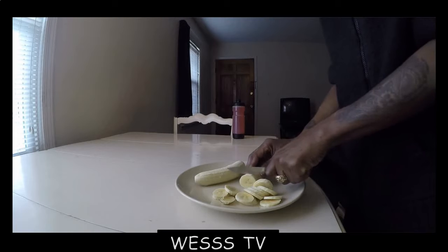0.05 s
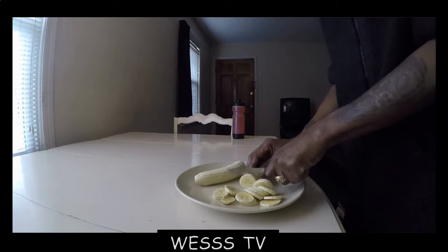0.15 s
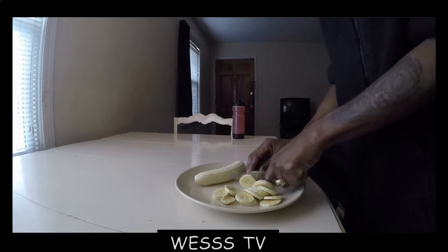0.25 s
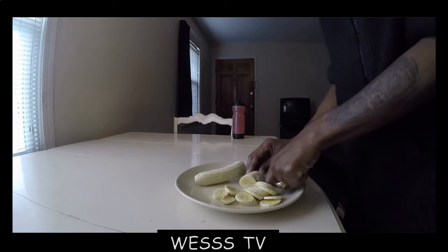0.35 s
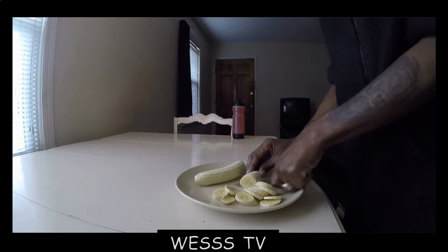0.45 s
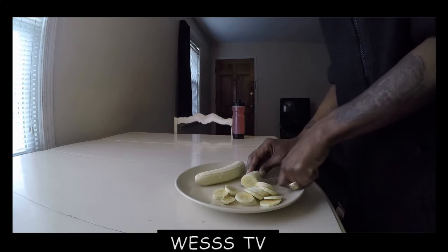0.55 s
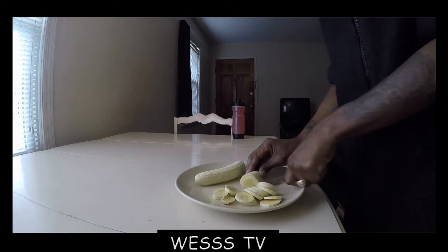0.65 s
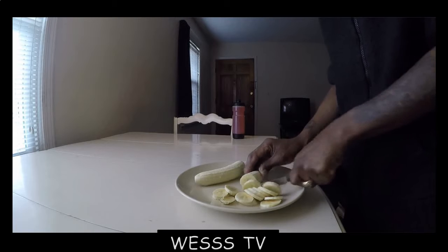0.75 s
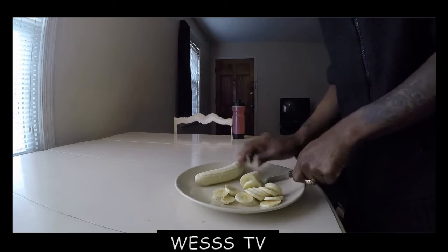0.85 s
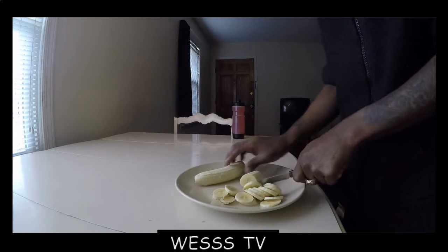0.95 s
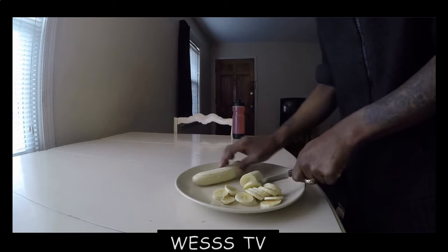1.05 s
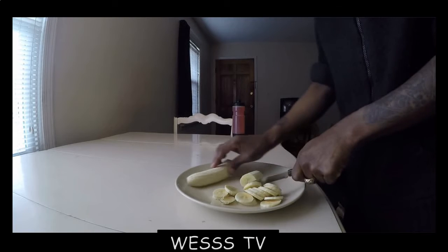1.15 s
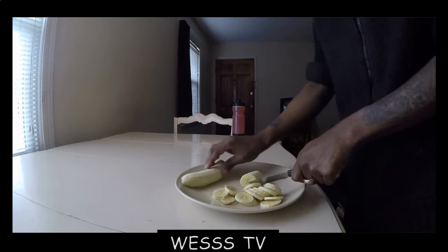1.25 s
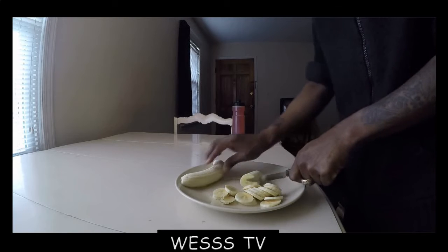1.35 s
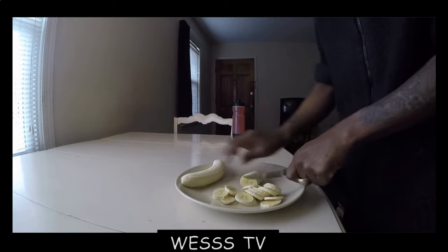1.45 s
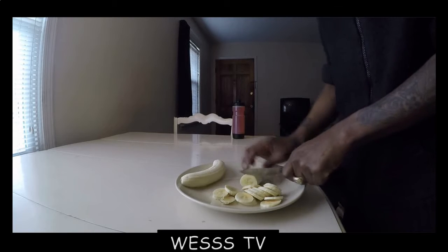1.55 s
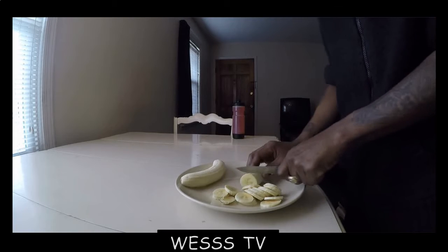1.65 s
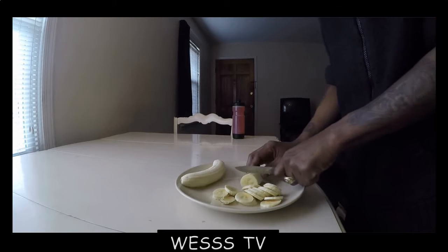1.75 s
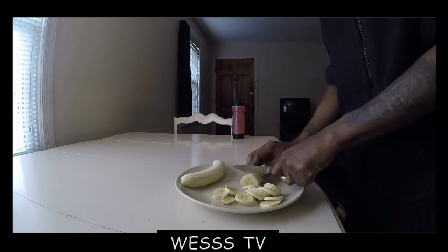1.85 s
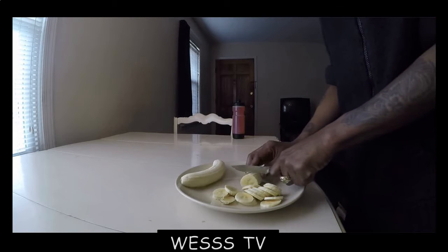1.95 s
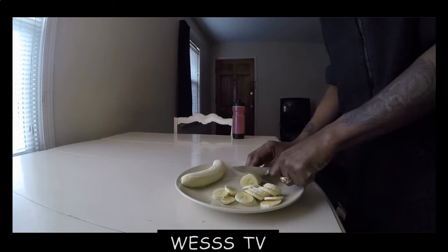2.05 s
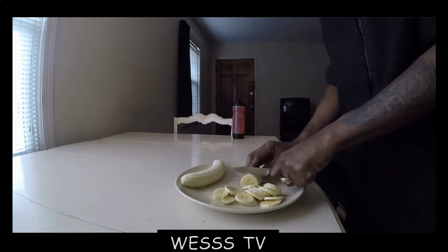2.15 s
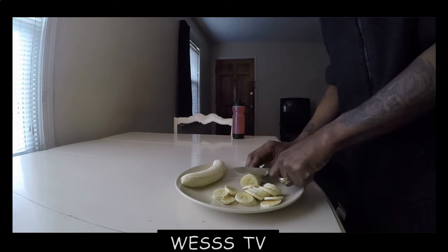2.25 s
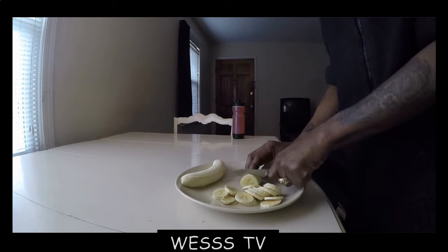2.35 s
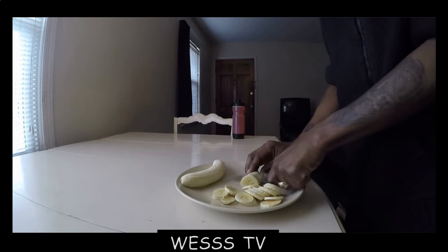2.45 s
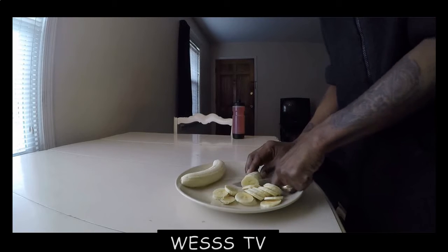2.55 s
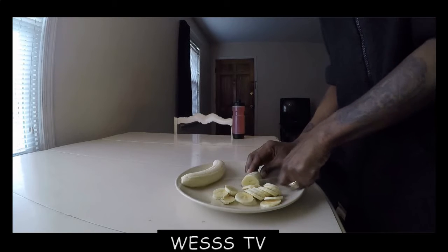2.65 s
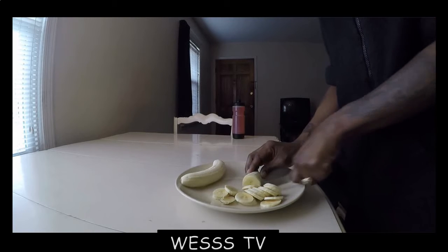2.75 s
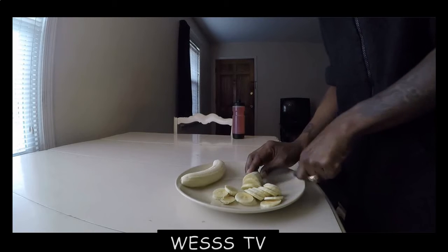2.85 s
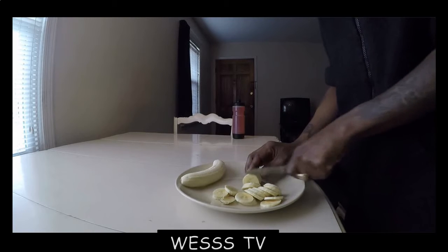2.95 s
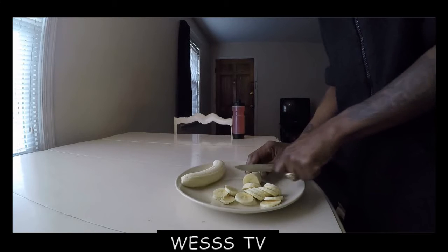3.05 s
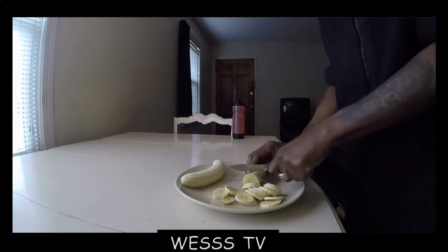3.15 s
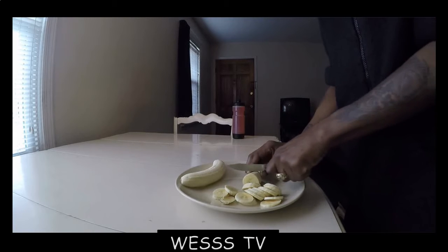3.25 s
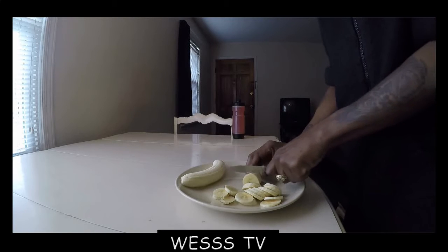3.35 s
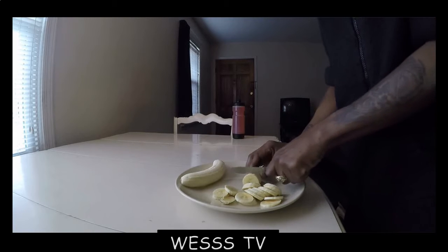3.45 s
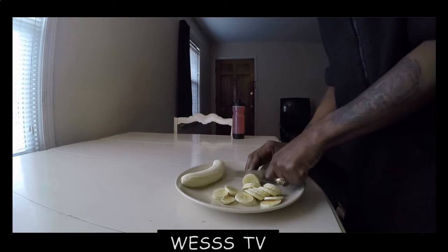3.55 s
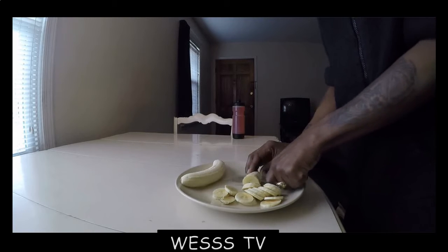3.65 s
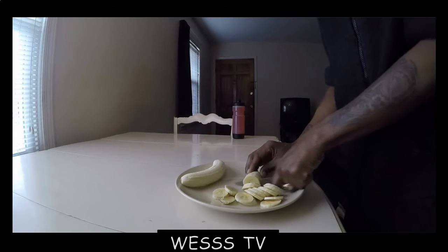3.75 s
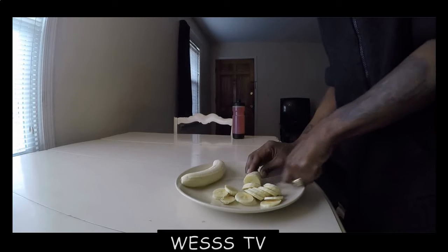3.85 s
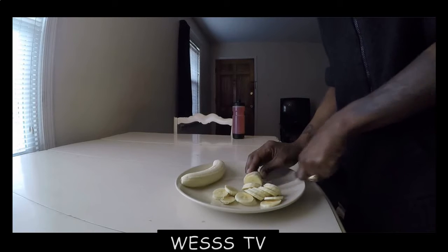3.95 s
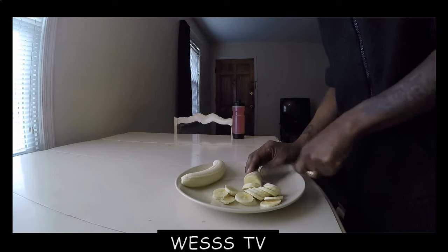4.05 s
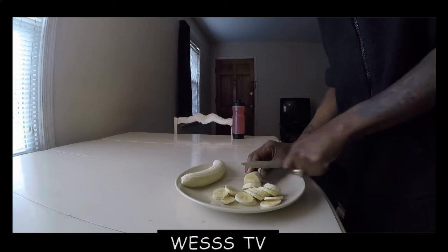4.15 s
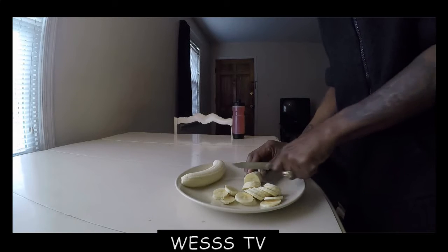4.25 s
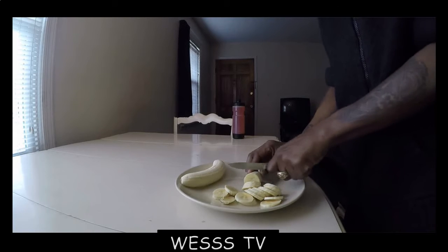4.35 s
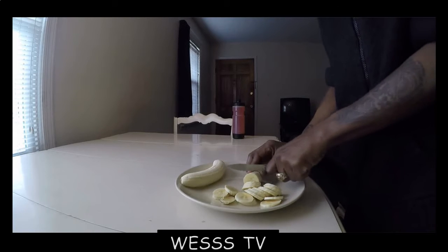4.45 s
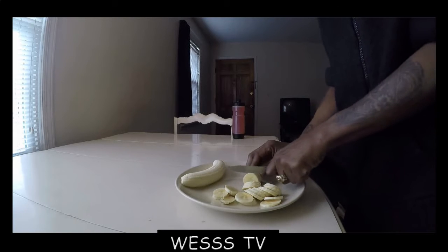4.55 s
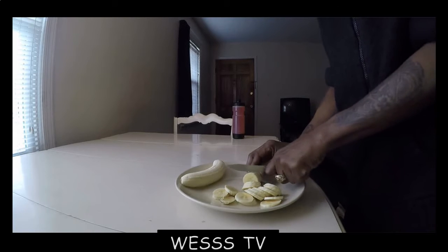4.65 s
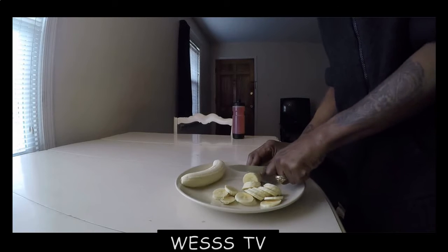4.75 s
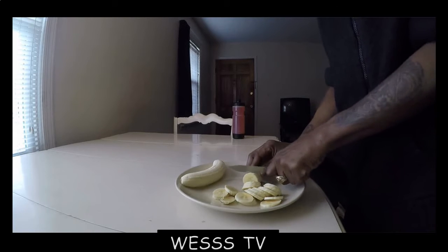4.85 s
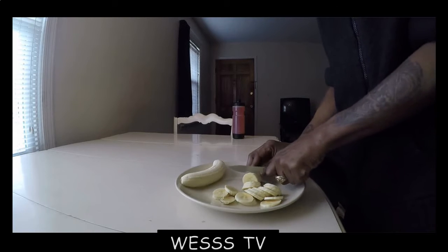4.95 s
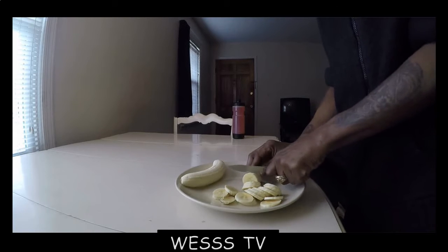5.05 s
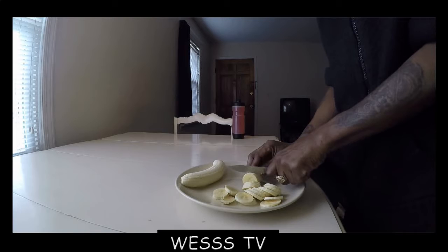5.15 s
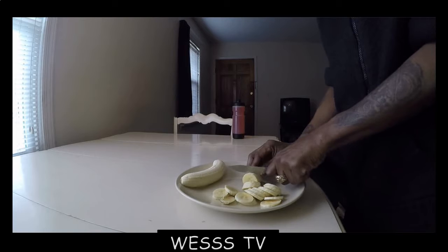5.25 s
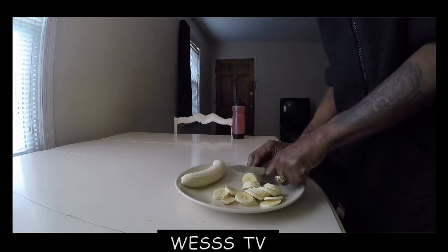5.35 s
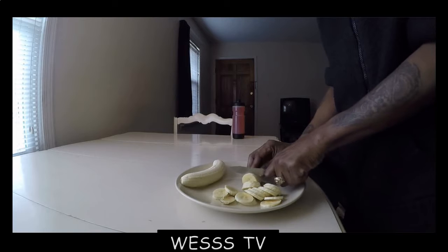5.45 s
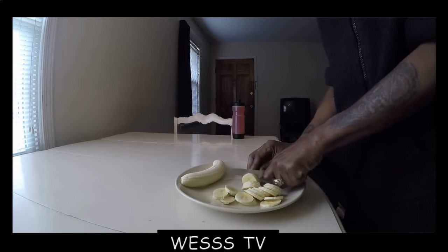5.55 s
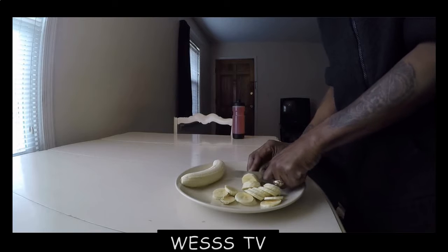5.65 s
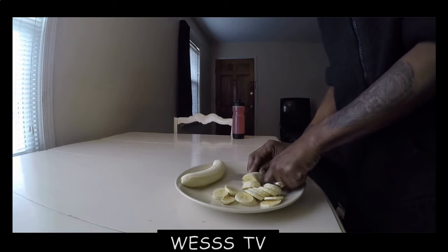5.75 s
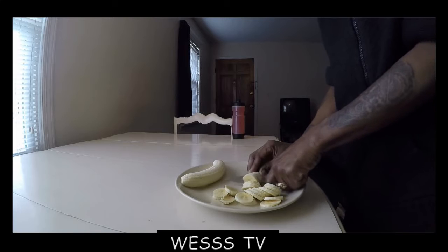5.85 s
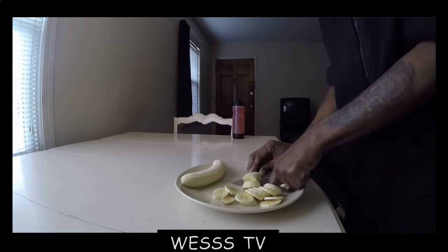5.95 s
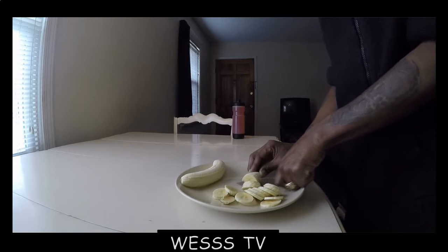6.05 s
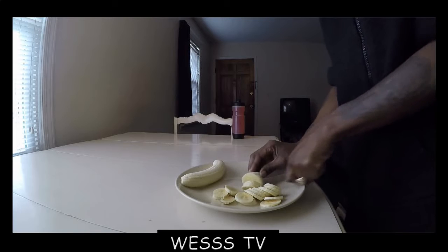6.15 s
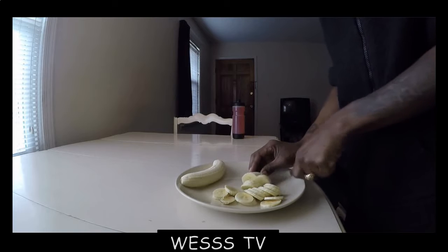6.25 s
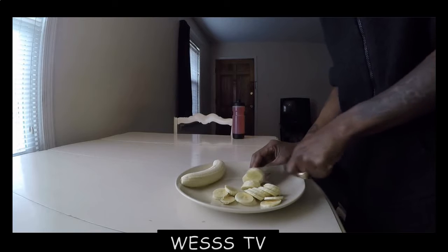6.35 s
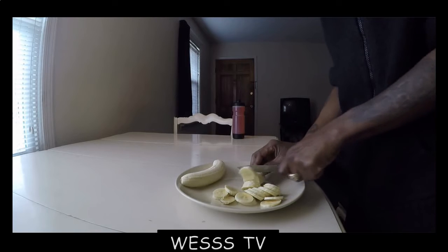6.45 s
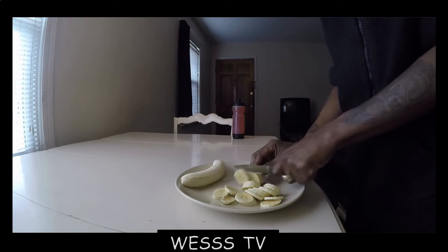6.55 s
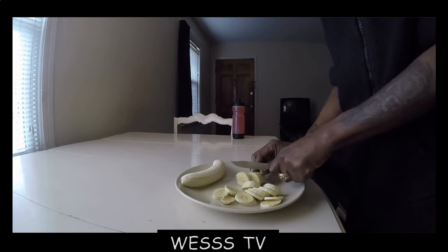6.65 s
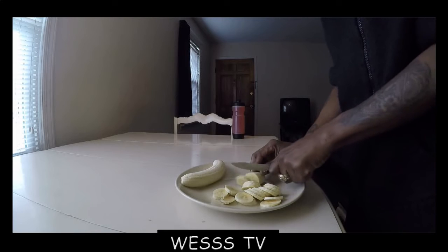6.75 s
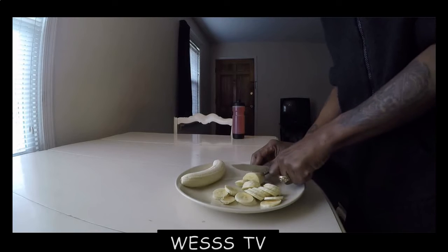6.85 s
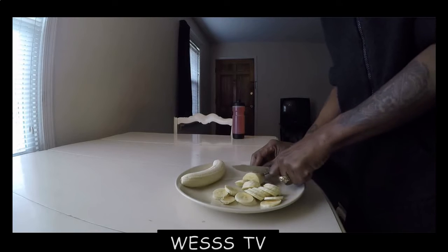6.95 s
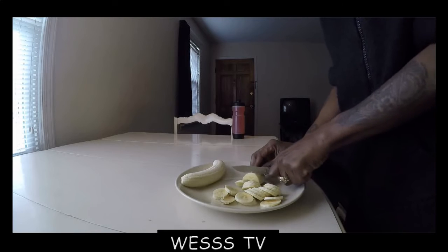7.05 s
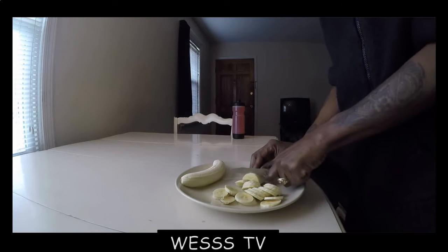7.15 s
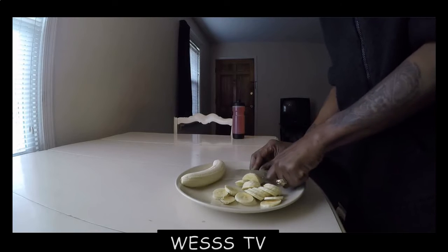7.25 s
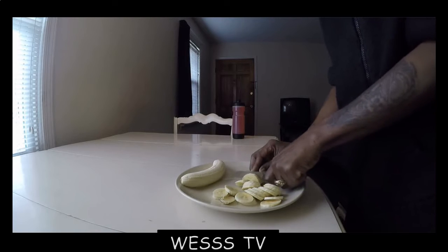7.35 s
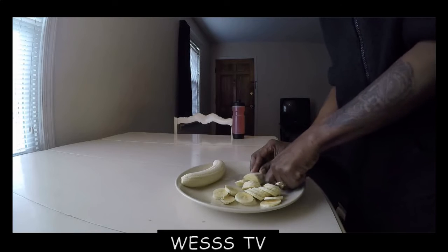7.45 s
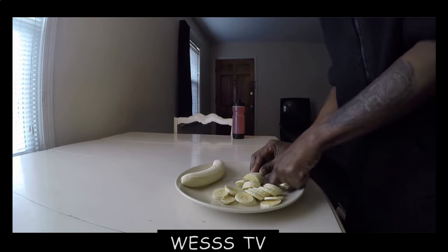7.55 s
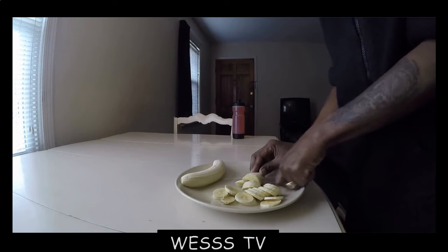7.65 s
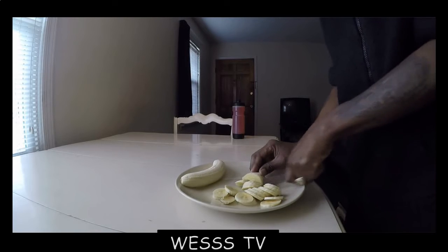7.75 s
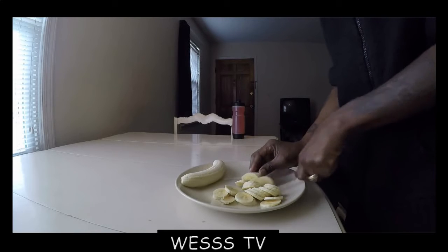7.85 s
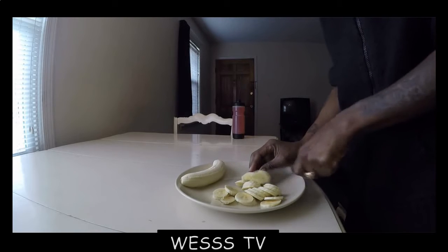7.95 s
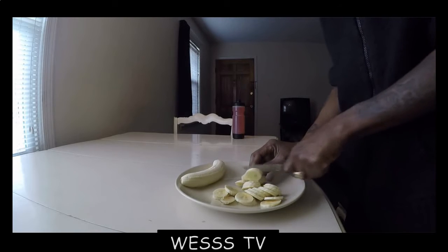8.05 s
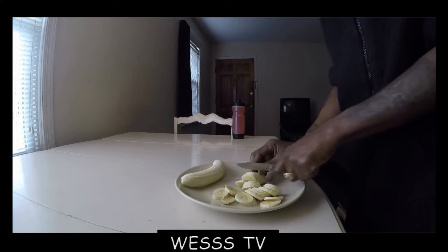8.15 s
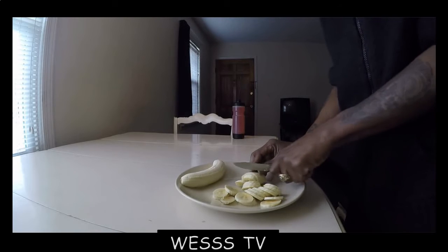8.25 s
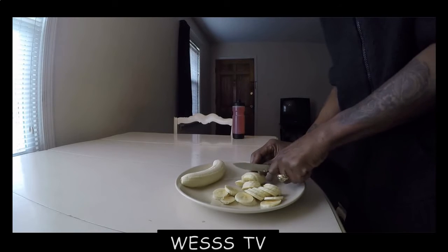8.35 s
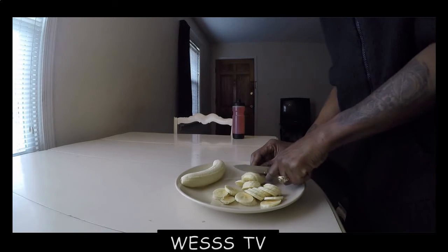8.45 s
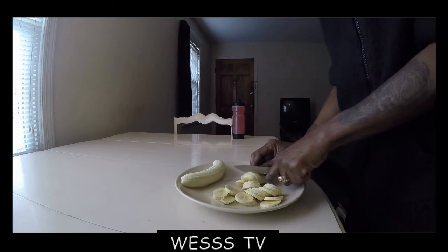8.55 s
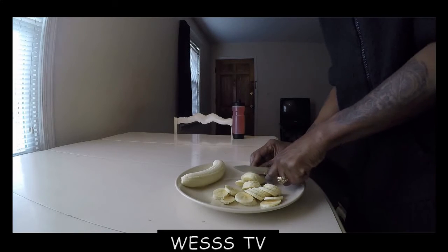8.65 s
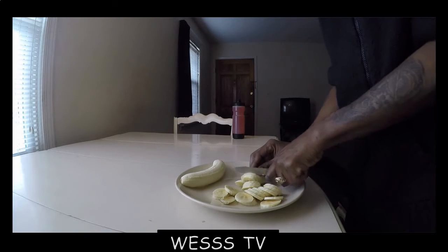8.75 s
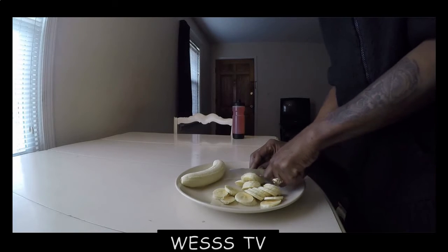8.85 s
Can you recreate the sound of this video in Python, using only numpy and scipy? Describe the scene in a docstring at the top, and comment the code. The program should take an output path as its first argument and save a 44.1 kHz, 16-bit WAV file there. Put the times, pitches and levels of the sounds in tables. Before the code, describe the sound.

Five unhurried knife cuts through soft fruit tap sharply on a ceramic plate and scrape back over the glaze, above faint room rumble.

```python
"""Slicing a banana on a plate

A table knife slices a peeled banana on a ceramic plate that stands on a table in a quiet room.
Five times the blade sinks almost silently through the fruit (soft hiss), clinks on the plate (dying
sine waves and noise bursts) and is drawn back, scraping over the glaze towards the rim (random tiny slips).
A near wall answers each clink. Faint squeaks, rubs and one low tone are heard between the cuts,
over a room that rumbles and hums faintly (shaped noise and a wavering sine)."""
import sys
import numpy as np
from scipy import signal
from scipy.fft import rfft, irfft, next_fast_len
from scipy.io import wavfile
from scipy.ndimage import uniform_filter1d

SR = 44100
rng = np.random.default_rng(int(sys.argv[2]) if len(sys.argv) > 2 else 0)


def to_wav(sig):
    """Store sig (one row per channel, or 1-D mono) as 16-bit WAV at the path in sys.argv[1].

    Samples outside -1..1 are clipped; the rate is SR.
    """
    pcm = np.clip(np.atleast_2d(sig), -1, 1) * 32767
    pcm = np.round(pcm).astype(np.int16)
    wavfile.write(sys.argv[1], SR, pcm.T)  # frames by channels


N = 392049

# In the tables, t60 is the time a sound takes to fade by 60 dB.
# Ways the room's background is loud or soft at each pitch: (frequency [Hz], relative level per Hz [dB])
AMBIENCE_SPECTRUM = [(11, -29), (20, -2), (34, 2.5), (58, -4), (80, -11.5), (100, -17.5), (130, -11),
                     (190, -19), (340, -24), (470, -32), (700, -36.5), (1400, -40), (5000, -44),
                     (15500, -55.5)]
# Early echoes off the table and the near wall: (delay [ms], level [dB])
EARLY_ECHOES = [(2.3, -11.5), (8.6, -9), (9.9, -8), (11.3, -9.5), (20.5, -14)]
# How long the room rings on at each pitch: (frequency [Hz], t60 [s])
ROOM_DECAY = [(80, 1), (400, 0.46), (1400, 0.24), (4000, 0.3), (7000, 0.23), (13000, 0.14)]
# Faint squeaks and rubs: (middle time [s], length [s], frequency [Hz], filter width [Hz], level before fades [dB])
RUB_EVENTS = [(1.097, 0.15, 1370, 300, -70.5), (1.378, 0.34, 345, 24.4, -63), (1.871, 0.11, 310, 50, -59.5),
              (2.058, 0.25, 3400, 696, -71.5), (3.225, 0.24, 1380, 80, -69), (6.496, 0.083, 419, 40, -58.5),
              (6.687, 0.19, 4960, 150, -74.5), (8.215, 0.15, 1046, 50, -68.5)]
# Ringing tones of the table top: (frequency [Hz], t60 [s], relative level [dB])
TABLE_MODES = [(80, .45, 3), (138.4, 0.85, -4)]
# Ringing tones of the steel blade: (frequency [Hz], t60 [s], relative level [dB])
BLADE_MODES = [(2851, 0.037, 3.5), (3000, 0.034, -3), (6230, 0.066, 2.5), (6700, 0.019, -7.5),
               (7080, .04, -3.5), (9300, 0.038, -11.5), (10220, .08, -7), (12250, .07, -11)]
# Ringing tones of the plate:
# (frequency [Hz], longest t60 [s], relative level in the well [dB], relative level near the rim [dB])
PLATE_MODES = [(753.4, .09, -13, -32), (1281, 0.12, -8.5, -9), (1373.6, 0.16, -5.5, -2.5),
               (1473, 0.0689, -3.5, -6), (1554, 0.068, -3.5, 0.5), (1627, 0.049, 1, -3),
               (1794, 0.038, -11, -23), (2003, 0.2, -25, -24.5), (2395, 0.077, -29, -5.5),
               (2820, 0.052, -26, -13.5), (3320, 0.051, -15.5, -7.5), (3580, 0.0587, -7, -0.5),
               (3697, 0.065, -0.5, -2.5), (3813, 0.03, 0.5, 2.5), (3906, 0.11, -6.5, -12.5),
               (3960, 0.051, -3, -16), (4077, .08, -0.5, -17), (4250, 0.061, -4, -20.5),
               (4730, .06, -13.5, -21), (4890, 0.05, -7, -7.5), (5520, 0.031, -28, -36.5),
               (6110, 0.16, -17, -32.5), (6540, .04, -16, -11.5), (7890, 0.05, -8, -16),
               (8300, 0.062, -16, -15), (10120, 0.11, -10, -31), (12200, 0.069, -15, -42),
               (12820, 0.18, -6.5, -38)]
# Strokes of the knife: (edge enters the fruit [s], hiss level before fades [dB],
# edge slides off the plate [s], scraping force [dB])
KNIFE_STROKES = [(.21, -67, 0.72, -44.5), (2.36, -65, 2.803, -36.5), (3.52, -64.5, 3.956, -38),
                 (5.70, -71.5, 6.229, -39.5), (7.40, -67.5, 7.83, -45)]
# Moments when the blade meets the plate: (time [s], ring level [dB], weight of the hand re ring [dB],
# ping of the blade re ring [dB], hardness [dB], place [0 = well, 1 = rim])
BLADE_BLOWS = [(0.4874, -18, -16.5, -20.5, -1.5, 0.048), (2.5726, -16.5, -13, -10, 0, 0.15),
               (3.712, -60.5, 2.5, -4, 9, 0.22), (3.7504, -20, -9.5, -6.5, -2, 0.18),
               (3.9540, -38, -29, -28, -3, 0.9), (5.9265, -55, 16.5, 6.5, -19, 0.57),
               (5.9677, -21.5, 1.5, -5, -1.5, 0.097), (6.1407, -46, -20, -22, -3, 0.64),
               (7.6003, -25.5, -8, -17.5, 8, 0.05), (7.6094, -33, -9.5, -22, 2, 1),
               (7.6232, -50, 25.5, 18.5, -19, 0.6), (7.852, -29, -29, -32, -1, 0.99)]
# Noise of the parting fruit: (frequency [Hz], relative level per Hz [dB])
FLESH_SPECTRUM = [(200, -7), (600, -4.5), (1500, -4), (3000, -9.5), (5000, -9.5), (9000, -18),
                  (15000, -20.5)]
# Grating of the edge on the glaze: (frequency [Hz], relative level per Hz [dB])
GRIT_SPECTRUM = [(300, -24), (1500, 33.5), (2100, -7), (3700, 28.5), (6500, 3), (9000, -31.5), (15000, -50)]
# Rumble of the drag in the table: (frequency [Hz], relative level per Hz [dB])
DRAG_SPECTRUM = [(150, -5), (350, -3), (500, 1), (800, -19), (1500, -3.5), (5000, -28.5)]
# Crack at the steel edge, before hardness and place: (frequency [Hz], relative level per Hz [dB])
CRACK_SPECTRUM = [(500, -21), (1050, -13), (1400, 2), (1800, 1), (2200, -17), (3700, 6.5), (5000, -2),
                  (5500, -9), (6300, 0), (8300, -8), (9500, -9.5), (13000, -10.5), (14000, -24),
                  (16000, -26)]
# Knock of the plate against the table: (frequency [Hz], relative level per Hz [dB])
KNOCK_SPECTRUM = [(60, -8.5), (200, -7.5), (420, -3), (600, -3.5), (800, -3), (1030, -6), (1400, -5),
                  (2200, -12.5), (5000, -36.5)]

AMBIENCE_DB = -47
HUM_HZ, HUM_DB = 120, -61
CUTOFF_HZ = 15500
# A faint low tone climbs, then falls part of the way back.
TONE_START_S, TONE_LENGTH_S, TONE_DB = 4.95, 0.248, -54.5
TONE_LOW_HZ, TONE_HIGH_HZ, TONE_RISE_S = 236.3, 296, 0.165
BOOM_DB, BOOM_DELAY_S = -16.5, 0.015   # the table top swings after each knock; level re knock
SINK_S = 0.27   # time through the fruit
# The blade slides back lightly, bites as it climbs the rim, then lifts off.
SLIDE_S, SWELL_S, LIFT_S = 0.06, 0.045, 0.048
SLIDE_DB, LIFTED_DB = -15, -19   # re the peak of the scrape
RING_CYCLES = 750   # under the wet fruit no plate tone's t60 exceeds this many cycles
TOP_WELL_DB, TOP_RIM_DB = -0.5, -10   # the highest overtones dull towards the rim
# A weighty blow also cracks more: level re ring [dB], extra dB per dB of weight, t60 [s]
CRACK_DB, CRACK_PER_WEIGHT, CRACK_T60_S = 9, 0.4, 0.019


def from_db(db):
    """Turn decibels into a gain."""
    return 10 ** (np.asarray(db) / 20)


def rms_one(x):
    """Scale a sound to an rms (average strength) of one."""
    return x / np.sqrt(np.mean(x ** 2) + 1e-20)


def at_hz(points, hz):
    """Read a table at any frequency, along a logarithmic frequency axis."""
    table_hz, value = np.transpose(points)
    return np.interp(np.log(np.maximum(hz, 1)), np.log(table_hz), value)


def clock(size):
    """Give the time of each sample in seconds."""
    return np.arange(size) / SR


def fade(t, t60):
    """Die away exponentially, 60 dB down after t60 seconds."""
    return np.exp(-np.log(1000) * t / t60)


def noise(spectrum, size):
    """Make noise of rms one whose pitches have the given strengths."""
    n = next_fast_len(size)
    gain = from_db(at_hz(spectrum, np.fft.rfftfreq(n, 1 / SR)))
    shaped = irfft(rfft(rng.standard_normal(n)) * gain, n)
    return rms_one(shaped[:size])


def add(out, start_s, sound):
    """Mix a sound in at its start time."""
    at = max(round(start_s * SR), 0)
    out[at:at + len(sound)] += sound[:max(N - at, 0)]


def struck(hz, t60, level_db):
    """Sum the dying sine waves of a touched object; neighbouring tones move in opposite directions."""
    t = clock(SR // 2)
    gain = from_db(level_db) * (-1) ** np.arange(len(hz))
    tones = np.sin(2 * np.pi * hz[:, None] * t) * fade(t, t60[:, None])
    return gain @ tones


def colour(hz, hard_db, place, low_db=-1):
    """Weight in dB that the hardness and the place of a touch give each frequency."""
    top_db = TOP_WELL_DB + place * (TOP_RIM_DB - TOP_WELL_DB) + min(hard_db, 0)
    return at_hz([(1700, low_db), (3000, 0), (4300, 0), (4900, hard_db), (11000, top_db)], hz)


def background(waver=0.35):
    """Low rumble and hiss of the room, with a slightly wavering mains hum."""
    slow_spectrum = [(1, 0), (4, 0), (30, -70), (100, -140)]
    sway = 1 + waver * noise(slow_spectrum, N)
    # a sine wave times the square root of two has an rms of one
    hum = np.sqrt(2) * from_db(HUM_DB) * sway * np.sin(2 * np.pi * HUM_HZ * clock(N))
    return from_db(AMBIENCE_DB) * noise(AMBIENCE_SPECTRUM, N) + hum


def room(x, tail_db=-7.5, onset_s=0.013, echo_cut_hz=9000):
    """Direct sound, echoes off the table and the near wall, then a diffuse tail fading at its own rate per band."""
    t = clock(SR * 3 // 5)
    white = rfft(rng.standard_normal(len(t)))
    hz = np.fft.rfftfreq(len(t), 1 / SR)
    tail = np.zeros(len(t))
    for band, (_, t60) in enumerate(ROOM_DECAY):
        # each band blends smoothly into its neighbours
        share = at_hz([(row[0], j == band) for j, row in enumerate(ROOM_DECAY)], hz)
        tail += irfft(white * share, len(t)) * fade(t, t60)
    tail *= 1 - np.exp(-(t / onset_s) ** 2)
    early = np.zeros(len(t))
    for delay_ms, level_db in EARLY_ECHOES:
        early[round(delay_ms * SR / 1000)] += from_db(level_db)
    response = signal.lfilter(*signal.butter(1, echo_cut_hz, fs=SR), early)
    response += from_db(tail_db) * tail / np.linalg.norm(tail)
    response[0] += 1   # the direct sound
    return signal.fftconvolve(x, response)[:N]


def low_tone():
    """A soft, nearly pure tone glides upward and sags."""
    out, t = np.zeros(N), clock(int(TONE_LENGTH_S * SR))
    arch = np.sin(np.pi / 2 * t / TONE_RISE_S) ** 2
    hz = TONE_LOW_HZ + (TONE_HIGH_HZ - TONE_LOW_HZ) * arch
    gain = from_db(TONE_DB) * signal.get_window(("tukey", 0.3), len(t))
    add(out, TONE_START_S, np.sqrt(2) * gain * np.sin(2 * np.pi * np.cumsum(hz) / SR))
    return out


def rubs():
    """Brief swells of friction noise, each kept to a narrow range of pitch."""
    out = np.zeros(N)
    for middle_s, length_s, hz, width_hz, level_db in RUB_EVENTS:
        size = int(length_s * SR)
        b, a = signal.iirpeak(hz, hz / width_hz, fs=SR)
        once = signal.lfilter(b, a, rng.standard_normal(SR))
        twice = signal.lfilter(b, a, once)
        squeak = rms_one(twice[-size:])   # the end, where the filter has settled
        add(out, middle_s - length_s / 2, from_db(level_db) * squeak * np.sqrt(np.hanning(size)))
    return out


def thumps(rise_s=0.0034):
    """The weight behind each blow sets the table top swinging."""
    out = np.zeros(N)
    boom = struck(*np.transpose(TABLE_MODES))
    boom *= 1 - np.exp(-clock(len(boom)) / rise_s)
    for hit_s, ring_db, weight_db, *_ in BLADE_BLOWS:
        add(out, hit_s + BOOM_DELAY_S, from_db(ring_db + weight_db + BOOM_DB) * boom)
    return out


def slicing():
    """Soft fruit parts round the blade with a faint, grainy, moist hiss."""
    out, size = np.zeros(N), int(SINK_S * SR)
    for start_s, hiss_db, _, _ in KNIFE_STROKES:
        wander = rms_one(uniform_filter1d(rng.standard_normal(SR), size=90))
        grains = from_db(3 * wander)   # level flutters by 3 dB rms
        hiss = rms_one(noise(FLESH_SPECTRUM, SR) * grains)[:size]
        add(out, start_s, from_db(hiss_db) * hiss * np.sqrt(np.hanning(size)))
    return out


def plate_ring(place, hard_db, scatter_db=1.56):
    """The plate's answer to one touch; place and hardness decide how strongly each tone rings."""
    hz, t60, well_db, rim_db = np.transpose(PLATE_MODES)
    level_db = (1 - place) * well_db + place * rim_db + colour(hz, hard_db, place)
    level_db += scatter_db * rng.standard_normal(len(hz))
    damped_t60 = np.minimum(t60, RING_CYCLES / hz)
    return struck(hz, damped_t60, level_db)


def scrapes(slips_per_s=1200, slip_hz=7000, ring_db=-2.0, grit_db=-12, drag_db=-60):
    """The edge sticks and slips on the glaze: the plate rings, the edge grates, the drag rumbles in the table."""
    out = np.zeros(N)
    phases = np.cumsum([0, SLIDE_S, SWELL_S, LIFT_S])
    t = clock(int(phases[-1] * SR))
    friction = from_db(np.interp(t, phases, [SLIDE_DB, SLIDE_DB, 0, LIFTED_DB]))
    for _, _, off_s, scrape_db in KNIFE_STROKES:
        start_s = off_s - SWELL_S - SLIDE_S
        slips = rng.random(len(t)) < slips_per_s / SR
        sizes = rng.standard_normal(len(t))
        force = from_db(scrape_db) * friction * rms_one(slips * sizes)
        force = signal.lfilter(*signal.butter(2, slip_hz, fs=SR), force)   # slips are softer than blows
        ring = plate_ring(place=0.86, hard_db=4)
        grit = noise(GRIT_SPECTRUM, SR // 50) * fade(clock(SR // 50), t60=0.037)
        for response, level_db in (ring, ring_db), (grit, grit_db):
            sound = signal.fftconvolve(force, response / np.linalg.norm(response))
            add(out, start_s, from_db(level_db) * sound)
        drag = noise(DRAG_SPECTRUM, SR)[:len(t)] * signal.get_window(("tukey", 0.5), len(t))
        add(out, start_s, from_db(drag_db) * drag)
    return out


def clinks(knock_t60=0.056, knock_rise_s=0.0011):
    """Each blow rings plate and blade, cracks at the steel edge and knocks the plate against the table."""
    out, t = np.zeros(N), clock(SR // 2)
    blade_hz, blade_t60, blade_modes_db = np.transpose(BLADE_MODES)
    for hit_s, ring_db, weight_db, blade_db, hard_db, place in BLADE_BLOWS:
        ring = plate_ring(place, hard_db)
        blade_level_db = blade_db + blade_modes_db + colour(blade_hz, hard_db, place)
        blade = struck(blade_hz, blade_t60, blade_level_db)
        edge = [(hz, db + colour(hz, hard_db, place)) for hz, db in CRACK_SPECTRUM]
        crack_gain = from_db(CRACK_DB + CRACK_PER_WEIGHT * weight_db)
        crack = crack_gain * noise(edge, len(t)) * fade(t, CRACK_T60_S)
        knock = from_db(weight_db) * noise(KNOCK_SPECTRUM, len(t)) * fade(t, knock_t60)
        knock *= 1 - np.exp(-t / knock_rise_s)
        add(out, hit_s, from_db(ring_db) * (ring + blade + crack + knock))
    return out


def scene():
    """Knife and plate echo in the room; thumps, rubs, the low tone and the background are added directly."""
    knife = room(slicing() + scrapes() + clinks())
    mix = background() + low_tone() + rubs() + thumps() + knife
    return mix[None]   # one channel


def record(dry):
    """Cut the top of the treble steeply."""
    return signal.sosfilt(signal.ellip(10, 0.1, 80, CUTOFF_HZ, fs=SR, output="sos"), dry)


dry = scene()
out = record(dry)
to_wav(out)
```